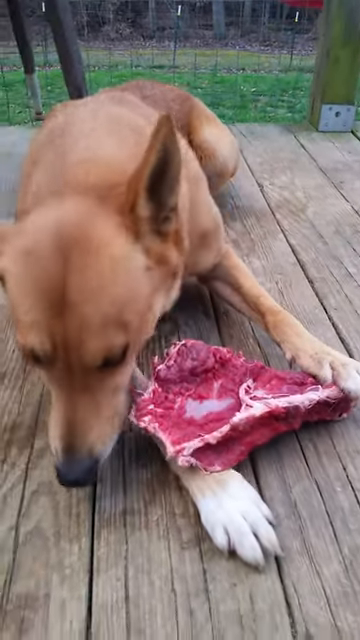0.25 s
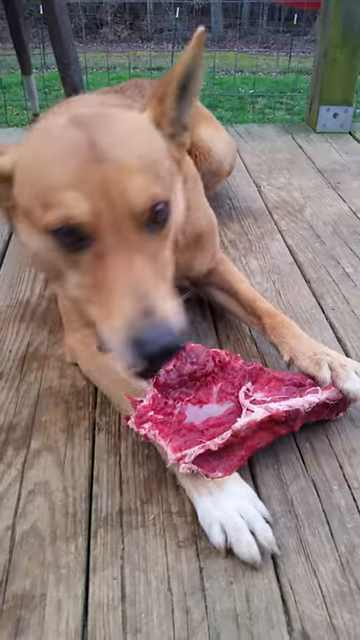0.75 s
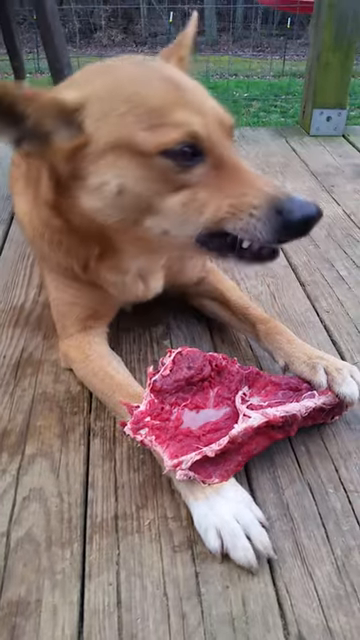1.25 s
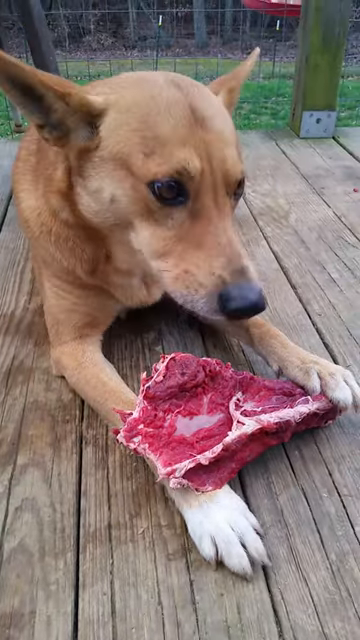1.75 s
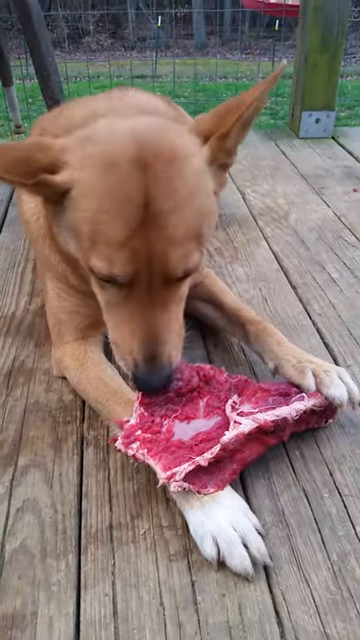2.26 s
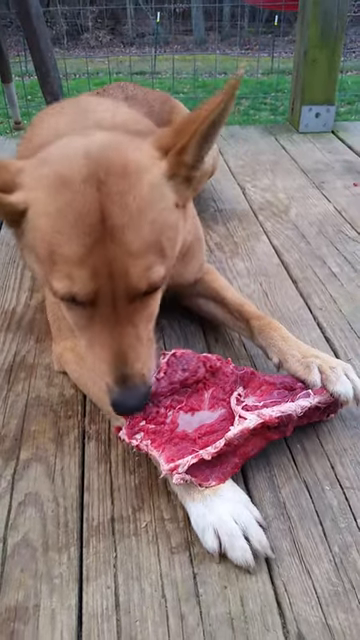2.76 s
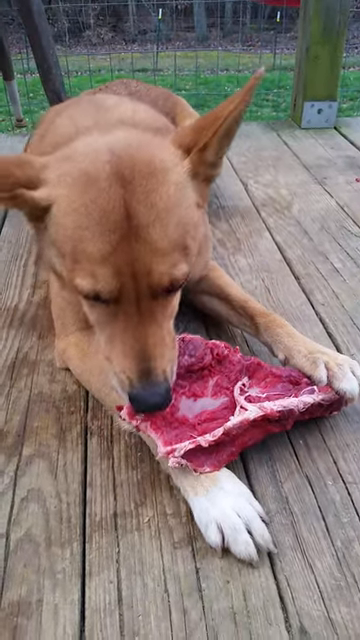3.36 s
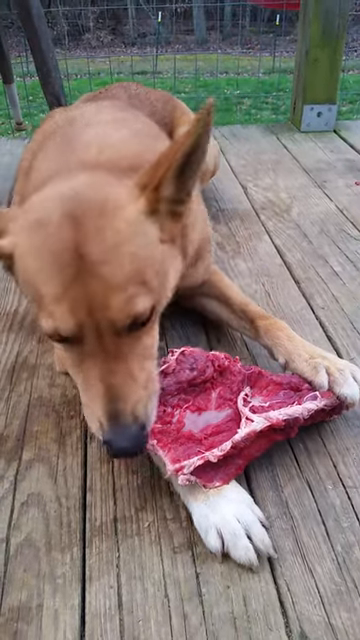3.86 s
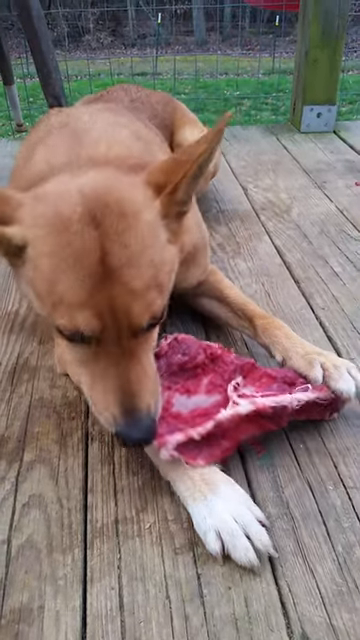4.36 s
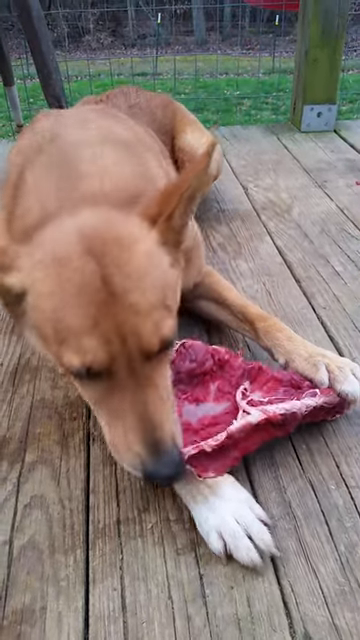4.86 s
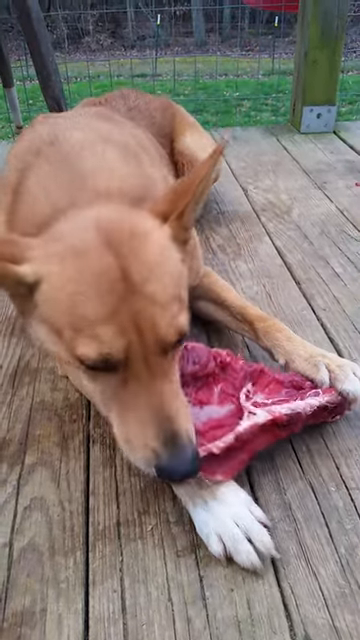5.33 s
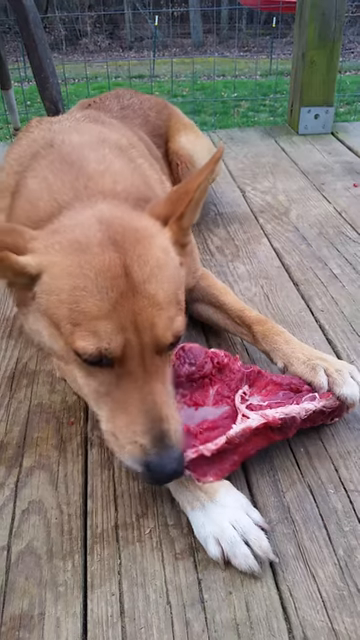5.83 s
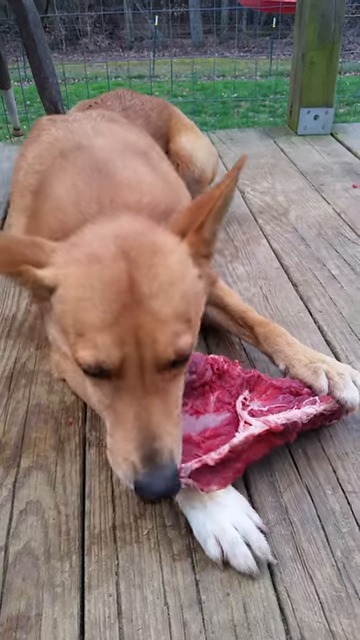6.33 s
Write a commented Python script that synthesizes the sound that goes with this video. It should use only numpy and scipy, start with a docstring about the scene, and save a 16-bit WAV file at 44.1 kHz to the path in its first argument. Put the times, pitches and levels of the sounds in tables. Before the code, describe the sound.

Close, wet chewing and clacking teeth as a dog works a meaty bone that knocks and drags on wooden boards.

```python
"""A dog gnaws a raw meaty bone on a wooden deck, close by, in a quiet garden.
Impacts and stick-slip friction of the bone excite the modes of the boards. Teeth clack on the bone
and rasp over gristle, the tongue pops and licks through cavity resonance, and bursting bubbles and
wet films make the meat crackle. The same tugs of the jaws drive the drag, the rasp and the crackle."""
import sys
import numpy as np
from scipy import signal
from scipy.fft import rfft, irfft, next_fast_len
from scipy.io import wavfile
from scipy.ndimage import uniform_filter1d

SR = 44100
rng = np.random.default_rng(int(sys.argv[2]) if len(sys.argv) > 2 else 0)


def dump(signal):
    """Clip the signal to [-1, 1] and save it as 16-bit WAV at the path in sys.argv[1]."""
    limited = np.clip(np.atleast_2d(signal).T, -1, 1)
    pcm = np.round(limited * 32767).astype(np.int16)
    wavfile.write(sys.argv[1], SR, pcm)


N = 290619
TIME = np.arange(N) / SR
BRIEF = TIME[:SR // 2]  # time axis of one short event
ANTIPHASE = np.array([[1], [-1]])

# Levels in the tables are relative: each layer applies its own gain.
# Garden air. Each row: frequency in Hz, level in dB.
AIR_SPECTRUM = [(15, -24.5), (25, -14), (48, 4), (108, 5.5), (195, -10.5), (309, -9.5), (560, -21.5),
                (775, -23.5), (1480, -36), (1940, -32), (3340, -49), (5280, -49.5), (7920, -61.5),
                (9840, -53.5), (11600, -43), (16000, -41.5)]
# Left-right likeness of the air. Each row: frequency in Hz, coherence from 0 to 1.
AIR_COHERENCE = [(60, 1), (300, 0.69), (1000, 0.17), (3000, 0), (12000, .05)]
# Chewing that goes on between tugs. Each row: time in seconds, level in dB.
CHEWING_LEVEL = [(0.0, -57.5), (0.86, -62.5), (1.0, -63), (1.44, -61.5), (2.32, -72.5), (2.83, -73.5),
                 (3.01, -54.5), (3.57, -75.5), (4.58, -67.5), (4.94, -71.5), (6.22, -67.5), (6.55, -84)]
# Tugs of the jaws. Each row: start and length in seconds, then drag, rasp and wet crackle levels in dB.
JAW_TUGS = [(0.045, 0.052, -35, -55, -87), (0.113, 0.039, -25, -51.5, -77),
            (0.291, 0.12, -35.5, -58.5, -90), (0.428, 0.033, -26.5, -55, -68),
            (0.518, 0.056, -25, -50.5, -84), (0.752, 0.024, -61, -63, -55), (0.827, 0.073, -34, -58.5, -66),
            (0.922, 0.049, -28.5, -55, -58), (1.007, 0.018, -32.5, -58.5, -96),
            (1.297, 0.032, -31, -54, -53), (1.399, 0.053, -35.5, -59.5, -69),
            (1.595, 0.089, -55, -63.5, -86), (1.821, 0.085, -44.5, -61, -62.5),
            (1.954, 0.052, -26.5, -51, -52), (2.42, 0.01, -40, -62.5, -73), (2.493, 0.1, -59.5, -66.5, -68),
            (2.831, 0.013, -43, -61.5, -55), (2.942, .04, -39.5, -58, -82), (2.987, 0.014, -23.5, -54, -55),
            (3.06, 0.093, -24.5, -51.5, -58.5), (3.193, 0.043, -37, -50, -60), (3.428, 0.01, -53, -53, -67),
            (3.781, 0.063, -46.5, -63, -70), (3.892, 0.077, -52, -66.5, -68.5),
            (4.096, 0.0089, -38, -70, -64), (4.182, 0.053, -67, -76, -65.5),
            (4.262, 0.013, -41.5, -59, -72), (4.516, 0.09, -38, -50, -55), (5.268, 0.11, -41, -61.5, -66.5),
            (5.62, 0.042, -52.5, -62.5, -80), (5.71, 0.037, -43.5, -56, -78), (5.885, 0.02, -39, -60, -64),
            (6.042, 0.015, -54, -56.5, -71), (6.099, 0.042, -43, -62, -74), (6.365, 0.087, -64, -69, -63),
            (6.482, 0.057, -48.5, -61, -70.5)]
# Films of saliva and strands of meat snap. Each row: start in seconds, level in dB.
FILM_SNAPS = [(0.413, -34.5), (0.7426, -30), (0.772, -43), (0.7941, -36), (0.8446, -31), (0.8612, -30.5),
              (0.895, -38), (1.226, -29), (1.274, -26.5), (1.564, -39), (1.603, -34.5), (1.6844, -45),
              (1.968, -35), (2.497, -38), (2.538, -41), (2.551, -35), (2.662, -38), (2.801, -34),
              (3.4885, -33), (3.5165, -36.5), (3.908, -34.5), (3.991, -44), (4.181, -40), (4.24, -51),
              (4.5543, -29), (4.581, -28), (4.6163, -25.5), (4.9912, -39), (5.1672, -48), (5.8556, -54),
              (5.9404, -46), (6.295, -45), (6.3712, -45)]
# Wet crackle. Each row: frequency in Hz, level in dB.
WET_SPECTRUM = [(900, -24.5), (2500, -24), (5500, -26.5), (7500, -23), (9200, -15), (11300, 2.5),
                (12800, -2.5), (14300, -11), (15500, -10), (17000, -5)]
# Modes of the deck boards. Each row: frequency in Hz, level in dB, 60 dB decay time in seconds.
BOARD_MODES = [(54.5, -5.5, 0.28), (107.5, -8.5, 0.37), (153, 2, 0.11), (212.2, 6, 0.081), (268, -4, 0.079),
               (317.4, -5, 0.14), (402, -5.5, 0.029)]
# Bone hits deck. Each row: start in seconds, boom level in dB, boom centre in Hz, knock level in dB.
BONE_BUMPS = [(0.104, -19.5, 196, -35.5), (0.126, -15.5, 216, -33), (0.294, -26, 182, -54),
              (0.324, -27.5, 179, -91), (0.433, -18, 230, -48), (0.538, -15, 213, -37.5),
              (0.577, -15.5, 264, -41.5), (0.829, -32, 236, -71), (0.855, -26, 201, -54),
              (0.943, -14.5, 228, -44), (1.277, -27, 192, -48), (1.311, -19, 195, -41),
              (1.414, -26, 190, -48), (1.642, -29.5, 122, -68), (1.834, -24, 156, -73),
              (1.946, -13, 256, -47), (1.964, -24, 223, -60), (2.283, -42.5, 156, -56),
              (2.822, -35.5, 187, -43), (2.988, -20, 246, -37), (3.005, -16, 210, -36),
              (3.061, -25, 243, -25.5), (3.088, -18, 242, -28.5), (3.102, -18, 220, -37.5),
              (3.432, -37, 238, -51), (4.018, -38.5, 108, -65), (4.108, -24, 148, -59.5),
              (4.26, -31.5, 212, -60), (4.458, -30, 161, -44), (4.516, -27.5, 294, -38.5),
              (4.535, -28, 123, -61), (5.246, -29.5, 264, -54), (5.592, -38.5, 347, -47.5),
              (5.633, -35, 344, -45.5), (5.715, -33, 346, -36), (5.891, -24, 124, -49.5),
              (6.1, -33.5, 207, -50), (6.582, -28, 210, -37)]
# Knock of the bone. Each row: frequency in Hz, level in dB.
KNOCK_SPECTRUM = [(200, -7.5), (340, -4.5), (520, -1.5), (720, 6.5), (1100, -7.5), (1700, -14),
                  (2600, -23.5), (4000, -40.5), (8000, -43)]
# Teeth on gristle. Each row: frequency in Hz, level in dB.
RASP_SPECTRUM = [(300, -26.5), (550, 7.5), (780, 1), (1100, -4), (1700, -14), (2500, -15.5), (3300, -26.5),
                 (5200, -27.5), (7500, -34.5), (16000, -17)]
# Modes of the bone in the jaws. Each row: frequency in Hz, level in dB, 60 dB decay time in seconds.
BONE_MODES = [(750, -85, 0.017), (813, 26.5, 0.04), (920, 9.5, 0.03), (1110, -1, 0.033), (2460, 5, 0.02)]
# The head comes down from chewing to gnawing. Each row: time in seconds, share of contact with the bone.
BONE_CONTACT = [(2.0, 0), (2.4, 1)]
# Teeth hit bone. Each row: start in seconds, crack level in dB, pitch in Hz, ring and edge levels in dB.
TOOTH_CLACKS = [(0.1476, -33, 2060, -39.5, -38.5), (0.1555, -28, 2120, -59, -38),
                (0.7699, -36, 3200, -71, -56), (1.1467, -29.5, 3270, -70, -57),
                (1.3108, -35.5, 2220, -44, -40), (1.5422, -41.5, 6500, -63, -50),
                (1.5968, -35, 4800, -61, -55), (2.823, -59.5, 2160, -63.5, -50),
                (3.0026, -33.5, 2260, -67, -27), (3.8301, -47.5, 1920, -53, -50.5),
                (4.4662, -21, 2220, -26.5, -29), (4.514, -18.5, 2450, -20, -29),
                (4.7576, -52, 5830, -59, -51), (5.286, -75, 2100, -48, -75),
                (5.6141, -39, 2800, -47.5, -44), (6.029, -57, 2040, -50.5, -51)]
# Crack of a tooth, also the tongue's squelch. Each row: frequency in Hz, level in dB.
CRACK_SPECTRUM = [(600, 4.5), (1700, -1), (2350, -0.5), (3000, -4), (3850, 0.5), (4600, -3.5), (5200, 2),
                  (7300, -17.5), (8300, -8.5), (9000, 4), (9800, -20.5), (16000, 2.5)]
# Bright edge of a clack. Each row: frequency in Hz, level in dB.
EDGE_SPECTRUM = [(3000, -64), (7500, -19), (9000, -8.5), (9800, -7), (11200, 5), (13300, -6), (14200, -2),
                 (15400, -10), (17000, 1.5)]
# The tongue pops off the palate. Each row: start in seconds, level in dB, initial cavity pitch in Hz.
TONGUE_POPS = [(0.151, -32.5, 1470), (0.218, -46.5, 1340), (0.335, -38.5, 1266), (0.356, -42.5, 1254),
               (0.922, -35, 773), (1.101, -50.5, 1470), (1.23, -43.5, 1210), (1.415, -33.5, 690),
               (1.581, -42.5, 1050), (1.614, -42.5, 1110), (1.633, -42.5, 1150), (2.499, -42.5, 710),
               (3.783, -42.5, 710), (5.689, -44, 780)]
# Tongue slides on meat. Each row: start and length in seconds, level in dB, initial cavity pitch in Hz.
TONGUE_LICKS = [(4.261, .2, -63.5, 1127), (4.865, .14, -76, 1373)]
# Response of the two microphone ports. Each row: frequency in Hz, left minus right in dB.
PORT_DIFFERENCE = [(100, -2), (700, 0.1), (1500, 1), (2800, 3), (5500, 12), (7500, 3), (9300, 6.5),
                   (11200, -16.5), (13000, -10.5), (15500, 9.5)]


def from_db(db):
    """Decibels to amplitude ratio."""
    return 10 ** (np.asarray(db) / 20)


def rms_one(x):
    """Normalise to unit rms."""
    return x / np.sqrt(np.mean(x ** 2) + 1e-20)


def peak_one(x):
    """Normalise to unit peak."""
    return x / (np.abs(x).max() + 1e-20)


def at_hz(points, hz):
    """Interpolate on a log-frequency axis."""
    f, value = np.transpose(points)
    return np.interp(np.log(np.maximum(hz, 1)), np.log(f), value)


def in_time(rows):
    """Interpolate linearly in time."""
    return np.interp(TIME, *np.transpose(rows))


def band(x, order, hz, kind="low"):
    """Maximally flat filter."""
    return signal.sosfilt(signal.butter(order, hz, kind, fs=SR, output="sos"), x)


def colour(x, spectrum):
    """Minimum-phase filter: folding the cepstrum of a dB spectrum makes it causal."""
    size = 2 * next_fast_len(x.shape[-1] // 2 + 2048)
    gain = from_db(at_hz(spectrum, np.fft.rfftfreq(size, 1 / SR)))
    cepstrum = irfft(np.log(gain))
    cepstrum[1:size // 2] *= 2
    cepstrum[size // 2 + 1:] = 0
    return irfft(rfft(x, size) * np.exp(rfft(cepstrum)))[..., :x.shape[-1]]


def add(track, start_s, sound):
    """Superpose a sound on a track."""
    start = max(round(start_s * SR), 0)
    track[..., start:start + sound.shape[-1]] += sound[..., :N - start]


def decay(t60):
    """Exponential damping: 60 dB in t60 seconds."""
    return from_db(-60 * BRIEF / t60)


def struck(modes, vary_db, detune=0):
    """Modal superposition: each point of contact weights the damped modes anew and may shift them."""
    ring = 0
    for hz, db, t60 in modes:
        gain = from_db(db + vary_db * rng.normal())
        shifted_hz = hz * (1 + detune * rng.normal())
        ring += gain * decay(t60) * np.sin(2 * np.pi * shifted_hz * BRIEF)
    return ring


def burst(t60, tail_db, tail_t60, channels=2):
    """Scattering: brief noise, then its tail off the boards, different in each channel."""
    envelope = decay(t60) + from_db(tail_db) * decay(tail_t60)
    return rng.standard_normal((channels, len(BRIEF))) * envelope


def fracture(t60, tail_db, tail_t60, grit):
    """Fracture: one impulse with a spray of finer breaks behind it."""
    return (BRIEF == 0) + grit * burst(t60, tail_db, tail_t60)


def grains(per_s, spread_db):
    """Shot noise: random clicks of uneven size."""
    sizes = from_db(spread_db * np.minimum(rng.exponential(1, N), 4))
    return sizes * rng.choice([-1, 1], N) * (rng.random(N) < per_s / SR)


def excite(force, response):
    """Convolution: every impulse of the force sets off the response."""
    return signal.fftconvolve(np.atleast_2d(force), np.atleast_2d(response), axes=1)[:, :N]


def steady(x, span_s):
    """Hold the running rms near 1, keeping the fine grain."""
    power = uniform_filter1d(np.atleast_2d(x ** 2).mean(0), int(span_s * SR))
    return x / np.sqrt(np.abs(power) + 1e-4 * np.mean(x ** 2))


def flutter(hz):
    """Smooth random modulation of unit rms."""
    return rms_one(band(rng.standard_normal(N), 2, hz))


def tug_envelope(layer, attack_s, release_s, linger_db, linger_s):
    """Tugs add in power: each swells, holds and lets go, then settles slowly."""
    column = ("drag", "rasp", "wet").index(layer)
    power, t = np.zeros(N), TIME[:SR]
    for start, length, *levels in JAW_TUGS:
        swell = np.minimum(t / attack_s, 1) ** 2
        after = np.maximum(t - attack_s - length, 0)
        fall_db = np.maximum(-60 * after / release_s, linger_db - 60 * after / linger_s)
        add(power, start - attack_s, (from_db(levels[column] + fall_db) * swell) ** 2)
    return np.sqrt(power)


def garden(level_db=-55.5):
    """Partial coherence: still air has a rumble common to both sides under a faint wide hiss."""
    coherence = at_hz(AIR_COHERENCE, np.fft.rfftfreq(N, 1 / SR))
    mid, side = rfft(rng.standard_normal((2, N)))
    air = irfft(np.sqrt(1 + coherence) * mid + np.sqrt(1 - coherence) * side * ANTIPHASE, N)
    return from_db(level_db) * rms_one(colour(air, AIR_SPECTRUM))


def saliva(chewing, level_db=-10, low_hz=1100, high_hz=6500, ring_cycles=2):
    """Bubble resonance: countless tiny bubbles burst between tongue and gums and ring briefly."""
    bubbles = []
    for hz in np.geomspace(low_hz, high_hz, 9):
        bursts = grains(per_s=260, spread_db=1.5)
        bubbles.append(excite(bursts, struck([(hz, 0, ring_cycles / hz)], vary_db=4)))
    left, right = sum(bubbles[::2]), sum(bubbles[1::2])
    return chewing * from_db(level_db) * rms_one(np.vstack([left, right]))


def meat(squeeze, snap_db=-0.5, crackle_db=-5, spurt_db=1.5, places=4):
    """Film rupture: a few loud snaps over spurts of fine crackle from several places in the mouth."""
    crackle = 0
    for _ in range(places):
        ruptures = grains(per_s=90, spread_db=1)
        crackle += excite(ruptures, fracture(t60=0.00092, tail_db=-12.5, tail_t60=0.051, grit=0.94))
    spurts = from_db(crackle_db + spurt_db * flutter(hz=22.5))
    out = squeeze * spurts * steady(colour(crackle, WET_SPECTRUM), span_s=0.053)
    for start, db in FILM_SNAPS:
        snap = fracture(t60=0.0066, tail_db=-11.5, tail_t60=0.052, grit=0.19)
        add(out, start, from_db(db + snap_db) * peak_one(colour(snap, WET_SPECTRUM)))
    return out


def rasp(pressure, gristle_db=-2.5, hollow_db=-13.5, bare_db=-3.5):
    """Friction: teeth catch densely on gristle; on bare bone its resonance turns the scrape hollow."""
    contact = in_time(BONE_CONTACT)
    catches = rms_one(grains(per_s=790, spread_db=0.5)) + rng.standard_normal((2, N))
    gristle = steady(colour(catches, RASP_SPECTRUM), span_s=0.1)
    hollow = steady(excite(catches, struck(BONE_MODES, vary_db=4)), span_s=0.04)
    gristle_gain = from_db(gristle_db + bare_db * contact)
    return pressure * (gristle_gain * gristle + from_db(hollow_db) * contact * hollow)


def cushioned(x, top_hz=390, bottom_hz=95):
    """Band limiting: meat cushions the top off a blow, and open boards radiate little deep bass."""
    return band(band(x, 8, top_hz), 2, bottom_hz, "high")


def bone_drag(drag, slip_db=-5, far_gain=0.14, joists_db=-21, joists_hz=(39.3, 82)):
    """Stick-slip friction of the bone drives the boards, and the joists rumble below."""
    board = cushioned(struck(BOARD_MODES, vary_db=1.5))
    slips = [excite(grains(per_s=410, spread_db=4.5), board) for _ in range(2)]
    near, far = [steady(slip, span_s=0.0208) for slip in slips]
    boards = near + far_gain * far * ANTIPHASE  # distant boards reach the two ports out of step
    joists = steady(band(rng.standard_normal(N), 2, joists_hz, "band"), span_s=0.11)
    return drag * (from_db(slip_db) * boards + from_db(joists_db) * joists)


def boom(centre_hz, focus_db=33.5):
    """Selective excitation: a long push wakes the low modes of the boards, a short one the high."""
    modes = [(hz, db - focus_db * np.log2(hz / centre_hz) ** 2, t60) for hz, db, t60 in BOARD_MODES]
    return peak_one(cushioned(struck(modes, vary_db=8, detune=0.022)))


def bone_bumps(boom_db=-2, lead_s=0.002, scatter_gain=0.69):
    """Impact: the boards boom and the bone gives a knock that scatters to both sides."""
    out = np.zeros((2, N))
    for start, boom_level, hz, knock_level in BONE_BUMPS:
        add(out, start - lead_s, from_db(boom_level + boom_db) * boom(hz))
        direct, scattered = colour(burst(t60=0.045, tail_db=-9, tail_t60=0.55), KNOCK_SPECTRUM)
        knock = peak_one(direct + scatter_gain * scattered * ANTIPHASE)
        add(out, start, from_db(knock_level) * knock)
    return out


def tooth_clacks(note_db=-10.5, ring_db=1, edge_db=13, focus_db=1.32):
    """Impulse excitation: a slipping tooth makes a crack centred on a short note, and the bone rings."""
    out = np.zeros((2, N))
    for start, crack_level, hz, ring_level, edge_level in TOOTH_CLACKS:
        spectrum = [(f, db - focus_db * np.log2(f / hz) ** 2) for f, db in CRACK_SPECTRUM]
        crack = fracture(t60=0.0027, tail_db=-5.5, tail_t60=0.069, grit=0.14)
        note = struck([(hz, 0, 0.006)], vary_db=6.5)
        ring = struck(BONE_MODES, vary_db=2, detune=0.006)
        edge = fracture(t60=0.0096, tail_db=-17, tail_t60=0.085, grit=0.29)
        add(out, start, from_db(crack_level) * peak_one(colour(crack, spectrum)))
        add(out, start, from_db(crack_level + note_db) * note)
        add(out, start, from_db(ring_level + ring_db) * peak_one(ring))
        add(out, start, from_db(edge_level + edge_db) * peak_one(colour(edge, EDGE_SPECTRUM)))
    return out


def tongue_pops(pop_db=-1.5, t60=0.021, rise_per_s=4.2, squelch_db=-20,
                split_db=-13.5, split_s=0.0073, split_octaves=0.53, bubbles=4):
    """Cavity resonance: a wet pocket tears open, rings upward and splits into smaller, higher bubbles."""
    out = np.zeros((2, N))
    for start, db, hz in TONGUE_POPS:
        phase = 2 * np.pi * hz * BRIEF * (1 + rise_per_s * np.minimum(BRIEF, t60))
        scatter = burst(t60=0.013, tail_db=-13.5, tail_t60=0.09, channels=1)
        pop = excite(np.sin(phase) * decay(t60), scatter)
        squelch = colour(burst(t60=0.032, tail_db=-17, tail_t60=0.071), CRACK_SPECTRUM)
        add(out, start, from_db(db + pop_db) * peak_one(pop))
        add(out, start, from_db(db + squelch_db) * peak_one(squelch))
        for late, higher in rng.random((bubbles, 2)):
            bubble = np.sin(phase * 2 ** (higher * split_octaves)) * decay(t60=0.005)
            add(out, start + late * split_s, from_db(db + split_db) * bubble)
    return out


def licks(width_hz=260, sag_per_s=1.5, upper_ratio=1.85, upper_db=-15):
    """Formants: soft friction sounds in two resonances of the mouth, which sink as the jaws open."""
    out = np.zeros((2, N))
    for start, length, db, hz in TONGUE_LICKS:
        phase = 2 * np.pi * np.cumsum(hz * np.exp(-sag_per_s * BRIEF)) / SR
        lower, upper = band(rng.standard_normal((2, len(BRIEF))), 2, width_hz / 2)
        mouth = lower * np.sin(phase) + from_db(upper_db) * upper * np.sin(upper_ratio * phase)
        stroke = np.sin(np.pi * np.minimum(BRIEF / length, 1))
        add(out, start, from_db(db) * stroke * rms_one(mouth))
    return out


def scene(stir_db=3.5):
    """Superposition of deck, mouth and garden; the same tugs drive boards, gristle and meat."""
    drag = tug_envelope("drag", attack_s=0.022, release_s=0.19, linger_db=-12, linger_s=0.9)
    pressure = tug_envelope("rasp", attack_s=0.023, release_s=0.15, linger_db=-7, linger_s=0.88)
    squeeze = tug_envelope("wet", attack_s=0.013, release_s=0.14, linger_db=-18, linger_s=0.34)
    chewing = from_db(in_time(CHEWING_LEVEL))
    squeeze += chewing * from_db(stir_db * flutter(hz=10.8))
    deck = bone_drag(drag) + bone_bumps()
    mouth = tooth_clacks() + tongue_pops() + licks() + saliva(chewing) + meat(squeeze) + rasp(pressure)
    return deck + mouth + garden()


def record(dry, cutoff_hz=16300):
    """Frequency response: each microphone port adds its colour, and the top is cut steeply."""
    left = colour(dry[0], [(hz, db / 2) for hz, db in PORT_DIFFERENCE])
    right = colour(dry[1], [(hz, -db / 2) for hz, db in PORT_DIFFERENCE])
    return signal.sosfilt(signal.ellip(10, 0.1, 80, cutoff_hz, fs=SR, output="sos"), [left, right])


dry = scene()
out = record(dry)
dump(out)
```